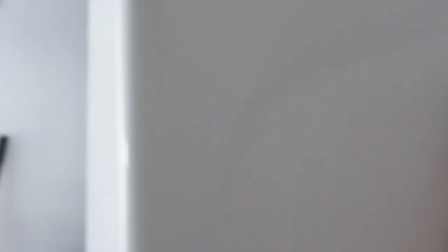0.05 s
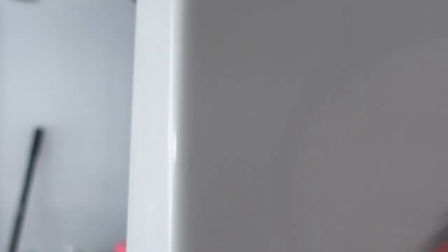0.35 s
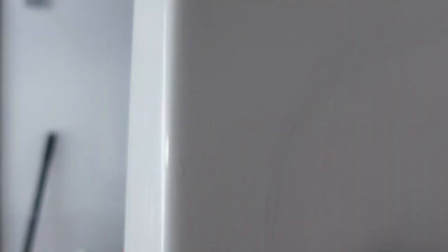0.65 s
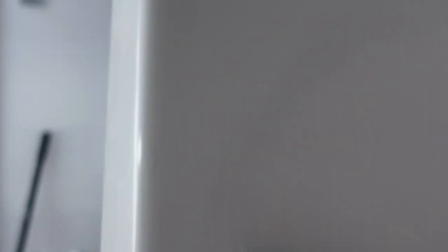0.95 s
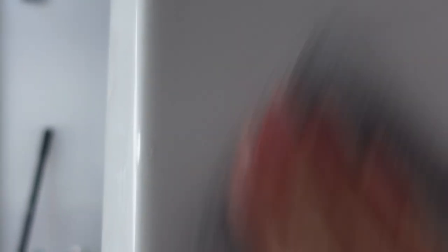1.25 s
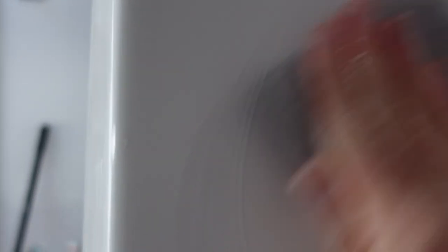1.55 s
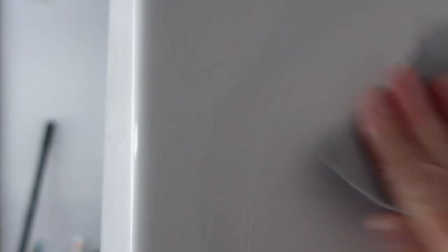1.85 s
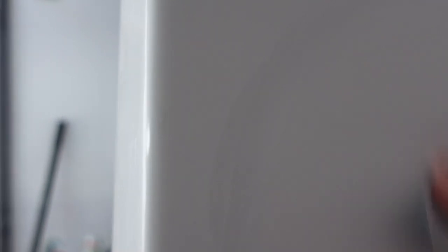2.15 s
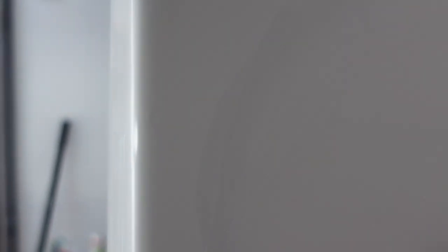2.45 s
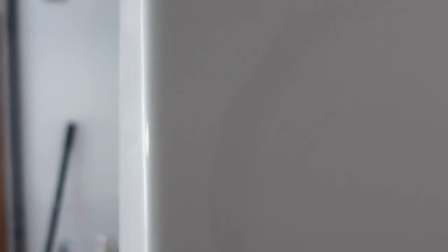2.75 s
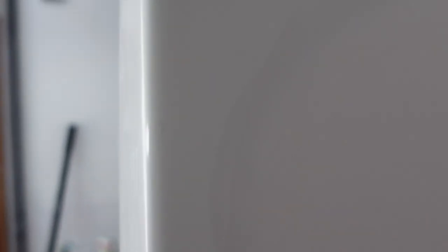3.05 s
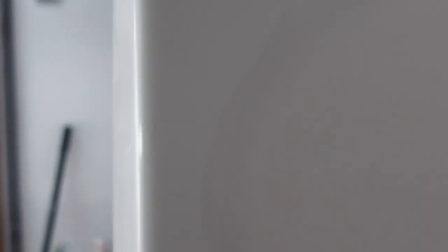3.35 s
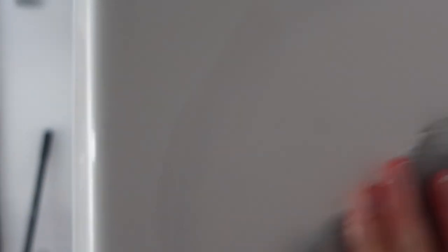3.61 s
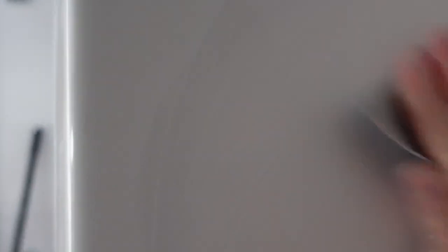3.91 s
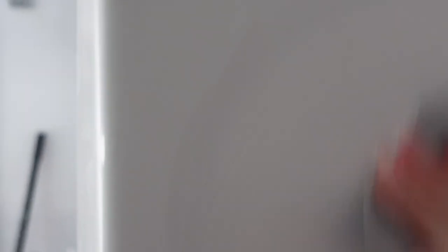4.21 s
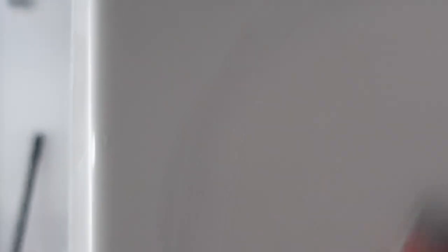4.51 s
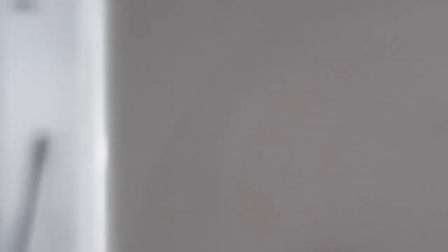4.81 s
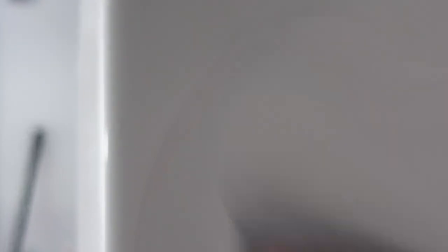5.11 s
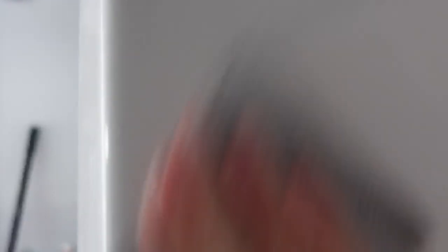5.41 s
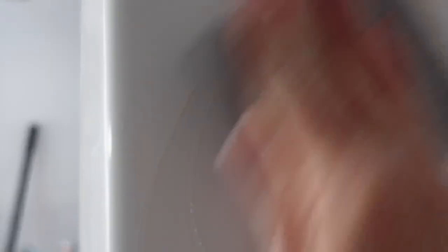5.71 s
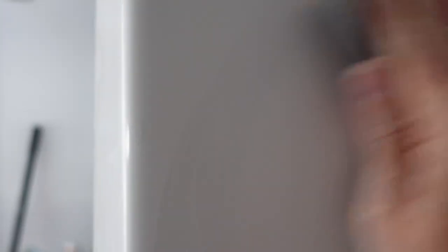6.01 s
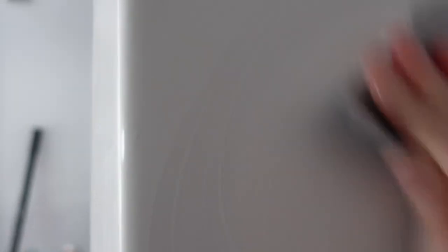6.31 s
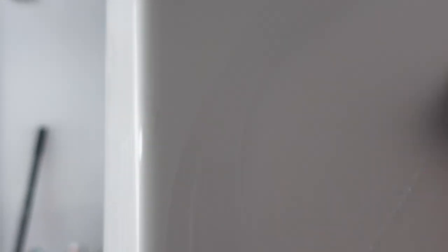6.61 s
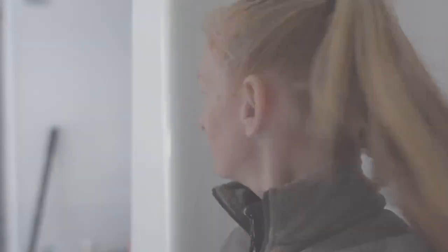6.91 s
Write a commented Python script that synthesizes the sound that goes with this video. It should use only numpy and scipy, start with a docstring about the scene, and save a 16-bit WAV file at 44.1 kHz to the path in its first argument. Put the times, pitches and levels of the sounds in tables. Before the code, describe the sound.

A hand sands a panel in quick back-and-forth strokes, a gritty rhythmic hiss with small pops at the turns.

```python
"""A gritty hiss swings to and fro, three strokes a second: a hand is sanding a gelcoat panel with a
soft block in a small cabin. Countless tiny scratches make the hiss, fuller and brighter on each push,
and the hollow panel rumbles beneath it. At the turns the block rocks and lands with a small pop and
a dull thud. Now and then the paper's edge rasps or a grain snaps. The hiss fades at the end."""
import sys
import numpy as np
from scipy import signal
from scipy.fft import rfft, irfft, next_fast_len
from scipy.io import wavfile
from scipy.ndimage import uniform_filter1d

SR = 44100
rng = np.random.default_rng(int(sys.argv[2]) if len(sys.argv) > 2 else 0)


def materialize(psi):
    """Save the field psi as 16-bit PCM at rate SR to the path in sys.argv[1].

    A 1-D psi becomes a single channel; in a 2-D psi each row is a channel.
    """
    bounded = np.clip(np.atleast_2d(psi).T, -1, 1)
    quanta = np.round(bounded * 32767).astype(np.int16)
    wavfile.write(sys.argv[1], SR, quanta)


N = 311325
TIME = np.arange(N) / SR
CLOCK = TIME[::32]  # coarser time steps, enough for the hand's slow motion

# the tone of the cabin's still air: f/Hz, level/dB
AIR_TONE = [(20, -11), (45, 0), (100, 1.5), (330, 5), (600, 3.5), (1200, -2.5), (4000, -2.5), (9000, -16),
            (16000, -16)]
# how long the cabin echoes: f/Hz, t60/s (the time to die away by 60 dB)
CABIN_DECAY = [(100, 0.25), (400, 0.42), (1200, 0.3), (4000, 0.15), (15000, 0.18)]
# the notes (modes) at which the hollow panel rings: f/Hz, width/Hz, level/dB
PANEL_MODES = [(74.5, 12, -7), (108.5, 10, 6.5), (169, 11.5, 3.5), (202.5, 34, -1), (254, 18, -0.5),
               (285.3, 21, 0.5), (326.5, 20, 0), (432, 26, 2.5), (503, 29, 0), (598, 30, 3), (665, 57, 0.5),
               (832, 190, 0.5)]
# the hand's weight shifts onto the panel: t/s, level/dB, f/Hz
WEIGHT_SHIFTS = [(0.061, -66, 129), (0.329, -63, 116), (0.467, -54.5, 105), (0.691, -62, 124),
                 (0.814, -62, 339), (1.019, -51.5, 284), (1.182, -55, 104), (1.356, -61, 287),
                 (1.525, -60, 334), (1.718, -55, 258), (1.871, -66, 229), (2.204, -65, 318),
                 (2.422, -59, 299), (2.546, -54.5, 202), (2.753, -61, 270), (2.901, -56, 106),
                 (3.232, -58, 245), (3.928, -54, 108), (4.138, -60, 288), (4.295, -56, 210),
                 (4.481, -56, 250), (4.624, -57, 336), (4.825, -66.5, 116), (4.982, -55, 207),
                 (5.167, -64, 283), (5.309, -54.5, 298), (5.518, -58, 109), (5.683, -55.5, 295),
                 (6.01, -51.5, 310), (6.22, -58, 310), (6.385, -53.5, 287), (6.554, -58, 280),
                 (6.682, -57, 333), (6.849, -60, 289), (6.911, -53, 269)]
# a coarse grain snaps: t/s, level/dB
GRAIN_SNAPS = [(2.337, -33), (4.3056, -28), (6.560, -29)]
# the block lands at a turn: t/s, level/dB, f/Hz, t60/s
LANDINGS = [(0.691, -50, 1100, 0.011), (.823, -32, 890, .005), (1.02, -37.5, 1090, 0.034),
            (1.193, -38, 970, 0.012), (1.364, -34.5, 1260, 0.022), (1.529, -27.5, 1050, 0.014),
            (1.720, -33, 1230, 0.023), (1.878, -25, 1030, 0.0045), (2.0654, -32.5, 1170, 0.01),
            (2.2134, -24.5, 1120, 0.0052), (2.411, -37.5, 1180, 0.012), (2.5501, -35.5, 1380, 0.0076),
            (2.762, -40.5, 1200, 0.021), (2.9012, -33, 1100, 0.0058), (3.099, -42, 1290, 0.01),
            (3.241, -35.5, 1250, 0.0098), (3.791, -46, 1440, 0.0098), (4.14, -40, 1370, .009),
            (4.484, -37.5, 1320, 0.012), (4.625, -37.5, 1470, 0.017), (4.830, -33, 1360, 0.015),
            (5.007, -37, 1290, 0.015), (5.172, -35.5, 1360, 0.012), (5.521, -37, 1260, .009),
            (5.683, -37, 1350, 0.016), (5.860, -38.5, 1410, 0.011), (6.201, -42, 1370, .009),
            (6.377, -37, 1180, 0.02), (6.541, -40.5, 1390, .009), (6.703, -37.5, 1390, 0.017)]
# the panel's skin rings: f/Hz, level/dB relative to a hard landing, t60/s
SKIN_MODES = [(930, -27, .1), (1020, -21.5, .16), (1140, -22, .17)]
# the paper's edge catches: middle t/s, length/s, f/Hz, level/dB
EDGE_CATCHES = [(0.066, .09, 1140, -58), (0.136, 0.24, 1930, -52.5), (0.17, 0.15, 2870, -50.5),
                (0.538, .12, 1830, -51.5), (0.563, 0.072, 4100, -51), (1.208, 0.15, 3000, -48.5),
                (3.474, 0.036, 805, -61.5), (3.63, .06, 4050, -47), (3.652, 0.07, 1390, -52.5),
                (5.338, 0.056, 3840, -46), (5.726, 0.046, 3340, -46), (6.074, 0.073, 1290, -53)]
# the hold on the block: t/s, firmness (0 to 1), f/Hz of the hollow under the block
HAND_GRIP = [(0, 0.07, 1040), (1.1, 0.5, 1120), (1.7, 0, 1220), (2.5, 0.67, 1300), (3.6, 0.82, 1460),
             (4.7, 0.92, 1380), (5.3, 0.98, 1380), (7, 0.9, 1220)]
# the push, where the hand is fastest and bears down:
# peak t/s, length/s, then level/dB of panel shake, block, scrape, swish and bite
PUSH_STROKES = [(0.18, 0.13, -66, -50, -51, -44.5, -46), (0.543, .14, -63, -52, -46.5, -44.5, -48),
                (0.874, .12, -61, -51, -48.5, -48, -44), (1.213, .14, -62.5, -47.5, -44.5, -44.5, -46),
                (1.562, 0.16, -62.5, -50, -47, -47, -45.5), (1.896, 0.13, -69, -55, -46.5, -53, -46),
                (2.238, .11, -65, -55, -48, -51, -49.5), (2.595, 0.2, -65.5, -55.5, -53.5, -50, -52.5),
                (2.926, 0.22, -68, -54, -54, -49.5, -49.5), (3.276, .16, -64, -57, -49, -49, -52),
                (3.64, 0.17, -60.5, -57.5, -49, -48.5, -51), (3.981, 0.13, -69, -49, -47.5, -45.5, -44),
                (4.326, 0.15, -62, -47.5, -45.5, -43.5, -43.5),
                (4.673, 0.17, -62.5, -47.5, -47, -46, -42.5), (5.012, 0.15, -61.5, -45.5, -45.5, -45, -41),
                (5.356, 0.16, -62.5, -45.5, -44.5, -46.5, -42),
                (5.701, .13, -62, -44.5, -43.5, -45.5, -41.5), (6.048, 0.16, -61, -45, -46, -46, -44.5),
                (6.399, 0.14, -62.5, -44.5, -45.5, -45, -44), (6.729, 0.14, -60, -45, -45.5, -44, -43.5)]
# the lighter pull back, which starts with a jerk:
# start t/s, length/s, then level/dB of panel shake, scrape and swish
PULL_STROKES = [(0.05, 0.097, -72, -54.5, -52), (0.326, .13, -69.5, -61, -51.5),
                (0.704, 0.22, -69, -57, -55), (1.022, .12, -58, -51.5, -52.5),
                (1.36, 0.16, -60.5, -54, -53), (1.71, 0.12, -58, -51, -47), (2.052, 0.11, -58, -59, -52),
                (2.404, 0.11, -56, -59, -46), (2.766, 0.068, -62, -60, -44.5),
                (3.09, 0.12, -61.5, -75, -48.5), (3.459, 0.08, -61, -68, -47), (3.78, 0.2, -63.5, -64, -58),
                (4.143, 0.12, -60.5, -57, -54), (4.47, 0.11, -58, -56, -51), (4.828, 0.18, -62.5, -52, -58),
                (5.163, 0.16, -59, -58, -52.5), (5.516, .15, -64, -57, -51.5), (5.856, 0.12, -61, -63, -55),
                (6.223, 0.19, -64, -52.5, -51.5), (6.544, .09, -62, -57, -56), (6.844, 0.13, -61, -66, -57)]
# the paper skims on lightly at the far end of a push: middle t/s, swish level/dB
PAPER_SKIMS = [(.98, -48.5), (1.66, -48), (2.02, -46.5), (2.345, -44), (2.67, -48), (3.04, -47.5),
               (3.42, -46.5), (4.08, -50), (4.76, -47.5), (5.46, -48.5), (5.79, -49), (6.82, -49)]
# the tone of the rubbing block, held loosely and held firmly: f/Hz, level/dB
LOOSE_TONE = [(300, -63), (600, -11.5), (1000, -9.5), (1500, 0), (1900, 0.5), (2300, 2.5), (2750, -2),
              (3300, -2.5), (5000, -40)]
FIRM_TONE = [(300, -31), (800, -25), (1000, -6.5), (1130, -7), (1280, 1.5), (1600, 0), (1880, -.5),
             (2200, 0.5), (2430, -13), (2700, -21), (3050, 3.5), (3500, -6), (5000, -40)]
# the paper's hiss in three layers, a low scrape, a higher swish and a sharp bite: f/Hz, level/dB
SCRAPE_TONE = [(1200, -49), (2100, -14), (2550, -16), (2800, -6.5), (3060, -4), (3480, -2.5), (4020, -1),
               (4420, -4.5), (5100, -15), (8000, -25)]
SWISH_TONE = [(2500, -28), (4000, -4.5), (4700, -2), (5150, -1), (5800, -0.5), (7000, -3), (8500, -6),
              (10000, -13), (15000, -17)]
BITE_TONE = [(4000, -38), (6500, -3.5), (8500, -1.5), (9700, -1.5), (11000, -4), (13000, -4), (15800, -9)]

START_S, STOP_S, STOP_DB_PER_S = 0.02, 6.895, 230  # the hand gets going, and stops at the end
PULL_ATTACK, PULL_RELEASE = 0.18, 0.72  # a pull's rise and fall, as shares of its length
PULL_BLOCK_DB, PULL_BITE_DB = -12.5, 1.5  # block and bite on a pull, relative to the scrape
SKIM_S, SKIM_LIFT_DB = 0.072, -0.5  # in a skim the hand's weight is off, so the panel shakes less
JOLT_DB, JOLT_S = -28.5, 0.018  # the shake after a landing: level relative to it, and fall time
HARD_DB, SOFT_LOSS = -23, 0.4  # a hard landing's level; extra dB of skin ring lost per dB below it
EDGE_RING_HZ, EDGE_HELD = 2485, 0.45  # the paper's free edge: pitch, share a firm grip holds down
TREBLE_LIMIT_HZ = 15750


def amp(db):
    """Turns decibels into a factor to multiply by."""
    return 10 ** (np.asarray(db) / 20)


def unit(x):
    """Scales a signal to an average size (rms) of 1."""
    return x / np.sqrt(np.mean(x ** 2) + 1e-20)


def look_up(points, hz):
    """Reads a frequency table between its rows."""
    f, value = np.transpose(points)
    return np.interp(np.log(hz + 1), np.log(f + 1), value)


def add(mix, s, sound):
    """Mixes a sound in, starting at s seconds."""
    part = mix[max(round(s * SR), 0):][:len(sound)]
    part += sound[:len(part)]


def filtered(x, gain):
    """Turns each frequency up or down by gain(hz); the result has rms 1."""
    size = next_fast_len(N + 8192)
    spectrum = rfft(x, size) * gain(np.fft.rfftfreq(size, 1 / SR))
    return unit(irfft(spectrum, size)[:N])


def resonate(x, hz, width):
    """Makes x ring at a pitch that follows the curve hz."""
    turn = np.exp(2j * np.pi * np.cumsum(hz) / SR)
    decay = np.exp(-np.pi * width / SR)
    return unit((turn * signal.lfilter([1 - decay], [1, -decay], x / turn)).real)


def wander(rate_hz):
    """A smooth random curve with rms 1."""
    return filtered(rng.standard_normal(N), lambda hz: np.exp(-(hz / rate_hz) ** 2))


def blow(hz, t60, rise_s):
    """A knock with peak 1: a swing starts softly and dies fast, and the air follows its speed."""
    t = np.arange(SR // 4) / SR
    size = (1 - np.exp(-(t / rise_s) ** 2)) * amp(-60 * t / max(t60, 0.002))
    speed = np.gradient(np.cos(2 * np.pi * hz * t) * size)
    return speed / abs(speed).max()


def swell(s, rise_s, fall_s):
    """A smooth hump of height 1 at time s."""
    t = CLOCK - s
    width = np.where(t < 0, rise_s, fall_s)
    return np.exp(-np.minimum((t / width) ** 2, 30))


def pushes(levels_db, lag_s, rise, fall):
    """One layer's power over all pushes; rise and fall are shares of a push's length."""
    return sum((amp(db) * swell(s + lag_s, rise * length, fall * length)) ** 2
               for (s, length, *_), db in zip(PUSH_STROKES, levels_db))


def pulls(levels_db):
    """One layer's power over all pulls: each takes hold quickly and eases off slowly."""
    power = 0
    for (s, length, *_), db in zip(PULL_STROKES, levels_db):
        rise_s = PULL_ATTACK * length
        power += (amp(db) * swell(s + rise_s, rise_s, PULL_RELEASE * length)) ** 2
    return power


def rubbing(strokes, glide_db):
    """One layer's level: the hand circles without resting, so the strokes ride on a steady glide."""
    starting = 1 - np.exp(-(CLOCK + 0.027) / START_S)
    stopping = amp(-STOP_DB_PER_S * np.maximum(CLOCK - STOP_S, 0))
    return np.interp(TIME, CLOCK, starting * stopping * np.sqrt(amp(glide_db) ** 2 + strokes))


def still_air():
    """The cabin's air is a faint, steady noise."""
    return amp(-73) * filtered(rng.standard_normal(N), lambda hz: amp(look_up(AIR_TONE, hz)))


def cabin_echo(x, gap_s):
    """Close walls send back a crowd of echoes; each band of pitch dies at its own speed."""
    length = SR // 2
    echoes = rng.choice([-1., 1.], length) * (rng.random(length) < 0.08)
    echoes *= np.arange(length) > gap_s * SR
    hz, t, bands = signal.stft(echoes, SR, nperseg=256)
    bands = bands * amp(-60 * t / look_up(CABIN_DECAY, hz)[:, None])
    tail = signal.istft(bands, SR, nperseg=256)[1]
    return signal.fftconvolve(x, tail / np.linalg.norm(tail))[:N]


def panel_gain(hz):
    """How strongly the panel answers each frequency: its modes added up, with alternating signs."""
    return sum(amp(db) * 1j * hz * width / (f ** 2 - hz ** 2 + 1j * hz * width) * (-1) ** k
               for k, (f, width, db) in enumerate(PANEL_MODES))


def panel_rumble():
    """Uneven drag and the jolt of each landing shake the panel's higher modes, but barely the lowest."""
    jolts = sum((amp(db + JOLT_DB) * swell(s + 0.0019, 0.0052, JOLT_S)) ** 2 for s, db, *_ in LANDINGS)
    strokes = pushes(np.transpose(PUSH_STROKES)[2], lag_s=-0.006, rise=0.47, fall=0.667)
    strokes += pulls(np.transpose(PULL_STROKES)[2])
    lift_db = SKIM_LIFT_DB * sum(swell(s, SKIM_S, SKIM_S) for s, _ in PAPER_SKIMS)
    fade_in = np.minimum(TIME / 0.18, 1) ** 2
    level = rubbing(strokes + jolts, glide_db=-69 + lift_db) * fade_in
    drag = rng.standard_normal(N) * amp(1.6 * wander(rate_hz=54))
    return amp(-1) * level * filtered(drag, lambda hz: panel_gain(hz) * hz / (hz + 200))


def panel_thuds():
    """The hand's weight bumps the panel, which rings on briefly in its low modes."""
    direct, force = np.zeros(N), np.zeros(N)
    for s, db, hz in WEIGHT_SHIFTS:
        add(direct, s, amp(db) * blow(hz, t60=0.067, rise_s=0.00088))
        add(force, s, amp(db) * blow(0.56 * hz, t60=0.011, rise_s=0.0015))
    return amp(-1.5) * direct + amp(-0.5) * np.std(direct) * filtered(force, panel_gain)


def grain_snaps():
    """Single coarse grains break loose with a tick."""
    out = np.zeros(N)
    for s, db in GRAIN_SNAPS:
        add(out, s, amp(db) * blow(hz=4640, t60=0.002, rise_s=0.0001))
    return out


def block_pops():
    """The block lands: the air under it pops, its soft pad taps and the panel's skin rings."""
    out = np.zeros(N)
    for s, db, hz, t60 in LANDINGS:
        hardness_db = db - HARD_DB
        add(out, s, amp(db + 0.1 + 0.07 * hardness_db) * blow(hz, t60, rise_s=0.00072))
        pad_db = 0.5 * db - 36.5  # the pad gives way under harder blows
        add(out, s, amp(pad_db) * blow(hz=640, t60=0.006, rise_s=0.0021))
        for skin_hz, skin_db, skin_t60 in SKIN_MODES:
            ring = blow(skin_hz * rng.uniform(0.96, 1.03), skin_t60, rise_s=0.0016)
            add(out, s, amp(db + skin_db + SOFT_LOSS * hardness_db) * ring)
    return out


def edge_scuffs():
    """The paper's edge catches and rasps: short swells of noise around one pitch."""
    out, t = np.zeros(N), np.arange(SR // 2) / SR
    f = np.fft.rfftfreq(len(t), 1 / SR)
    for s, length, hz, db in EDGE_CATCHES:
        band = 1 / (1 + ((f - hz) / (0.056 * hz + 60)) ** 2)
        rasp = unit(irfft(rfft(rng.standard_normal(len(t))) * band, len(t)))
        start = max(s - t.mean(), 0)
        hump = np.exp(-(2 * (start + t - s) / length) ** 2)
        add(out, start, amp(db) * rasp * hump)
    return out


def grit(tone, grains_per_s, spread_db, patchy_db):
    """Countless tiny scratches; the patches that touch keep shifting, so the tone keeps changing."""
    size = amp(spread_db * np.minimum(rng.exponential(1, N), 5))
    clicks = rng.standard_normal(N) * size * (rng.random(N) < grains_per_s / SR)
    hz, _, bands = signal.stft(clicks, nperseg=512, noverlap=384, fs=SR)
    patches = rng.standard_normal(bands.shape[::-1]).T
    patches = uniform_filter1d(patches, size=7, axis=0)  # smooth across pitch
    patches = unit(uniform_filter1d(patches, size=14, axis=1))  # and across time
    bands = bands * amp(look_up(tone, hz)[:, None] + patchy_db * patches)
    return unit(signal.istft(bands, nperseg=512, noverlap=384)[1][:N])


def sanding():
    """Paper and block rub the panel together: on a push, swish and scrape lead, block and bite follow."""
    block_db, scrape_db, swish_db, bite_db = np.transpose(PUSH_STROKES)[3:]
    pull_scrape_db, pull_swish_db = np.transpose(PULL_STROKES)[3:]
    block_push = pushes(block_db, lag_s=0.006, rise=0.29, fall=0.5)
    scrape_push = pushes(scrape_db, lag_s=-0.013, rise=0.47, fall=0.62)
    swish_push = pushes(swish_db, lag_s=-0.023, rise=0.23, fall=0.83)
    bite_push = pushes(bite_db, lag_s=0.0045, rise=0.38, fall=0.63)
    skims = sum((amp(db) * swell(s, SKIM_S, SKIM_S)) ** 2 for s, db in PAPER_SKIMS)
    block_level = rubbing(block_push + pulls(pull_scrape_db + PULL_BLOCK_DB), glide_db=-62)
    scrape_level = rubbing(scrape_push + pulls(pull_scrape_db), glide_db=-52)
    swish_level = rubbing(swish_push + pulls(pull_swish_db) + skims, glide_db=-51.5)
    bite_level = rubbing(bite_push + pulls(pull_scrape_db + PULL_BITE_DB), glide_db=-53)

    # a firm grip sharpens the block's hollow ring
    grip_s, *grip_columns = np.transpose(HAND_GRIP)
    firm, hollow_hz = [np.interp(TIME, grip_s, column) for column in grip_columns]
    loose = grit(LOOSE_TONE, grains_per_s=9000, spread_db=0.9, patchy_db=3.5)
    tight = grit(FIRM_TONE, grains_per_s=9000, spread_db=1.0, patchy_db=3.5)
    block = amp(2.1) * np.sqrt(1 - firm) * loose + amp(-0.56) * np.sqrt(firm) * tight
    hollow = resonate(rng.standard_normal(N), hollow_hz, width=370)
    hollow = resonate(hollow, hollow_hz, width=360)
    hollow_level = amp(-15.5) * block_level + rubbing(0, glide_db=-69)

    scrape = amp(-0.22) * grit(SCRAPE_TONE, grains_per_s=16000, spread_db=0.2, patchy_db=2.0)
    swish = amp(0.07) * grit(SWISH_TONE, grains_per_s=22000, spread_db=0.5, patchy_db=1.46)
    bite = amp(0.67) * grit(BITE_TONE, grains_per_s=26000, spread_db=-2.0, patchy_db=1.8)
    # the paper's free edge hisses in one broad band
    edge = filtered(rng.standard_normal(N), lambda hz: 1 / (1 + ((hz - EDGE_RING_HZ) / 350) ** 2))
    edge_level = rubbing(pulls(pull_scrape_db - 5), glide_db=-60) * (1 - EDGE_HELD * firm)
    return (block_level * block + hollow_level * hollow + edge_level * edge
            + scrape_level * scrape + swish_level * swish + bite_level * bite)


def scene():
    """Rubbing and knocks close by, over the panel's rumble and the cabin's echoes and air."""
    rub = sanding() + edge_scuffs()
    knocks = block_pops() + panel_thuds() + grain_snaps()
    air = still_air()
    place = np.pi * wander(rate_hz=3.26)  # as the hand travels, other echoes take over
    rub_echo = cabin_echo(rub * np.cos(place), gap_s=0.003)
    rub_echo += cabin_echo(rub * np.sin(place), gap_s=0.003)
    sound = amp(-0.38) * rub + panel_rumble() + knocks + air
    sound += amp(-10) * rub_echo + amp(-8) * cabin_echo(knocks, gap_s=0.004)
    return np.array([sound, sound])


def record(dry):
    """One microphone on both channels, with the highest treble cut off steeply."""
    low_pass = signal.firwin(701, TREBLE_LIMIT_HZ, window=("kaiser", 8), fs=SR)
    return signal.oaconvolve(dry, low_pass[None], "same")


dry = scene()
out = record(dry)
materialize(out)
```